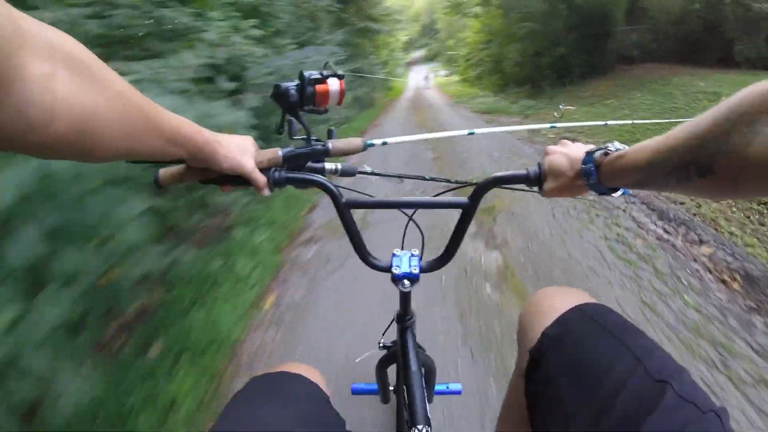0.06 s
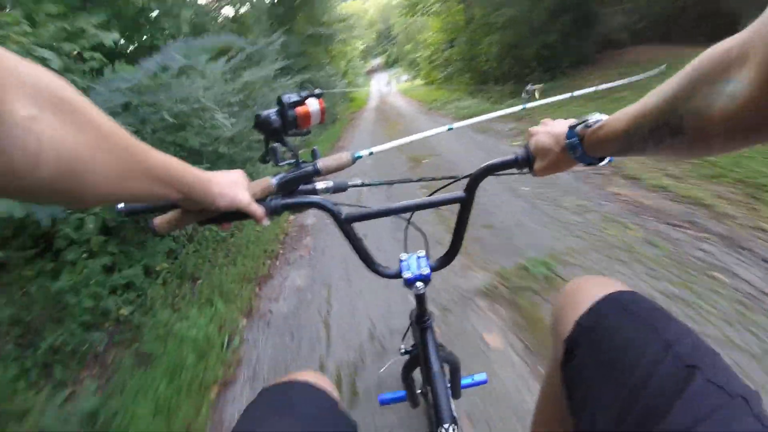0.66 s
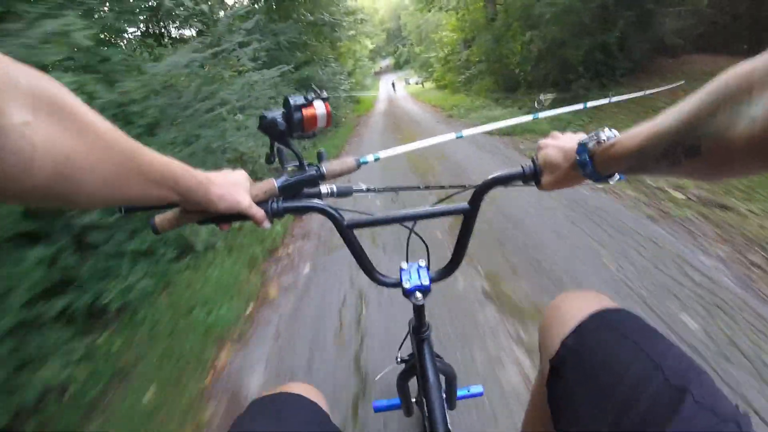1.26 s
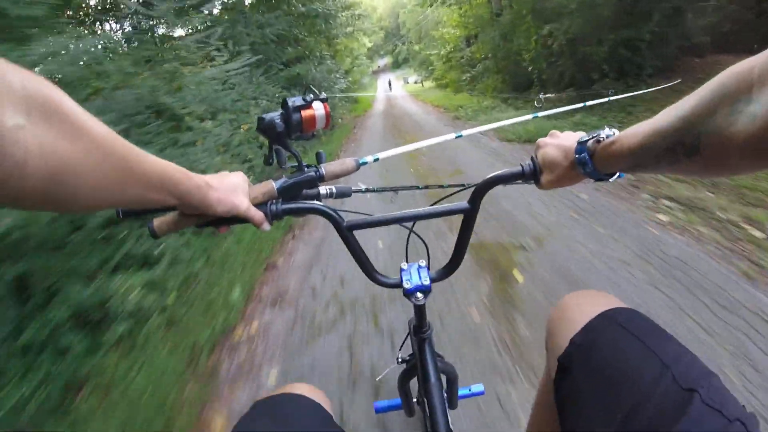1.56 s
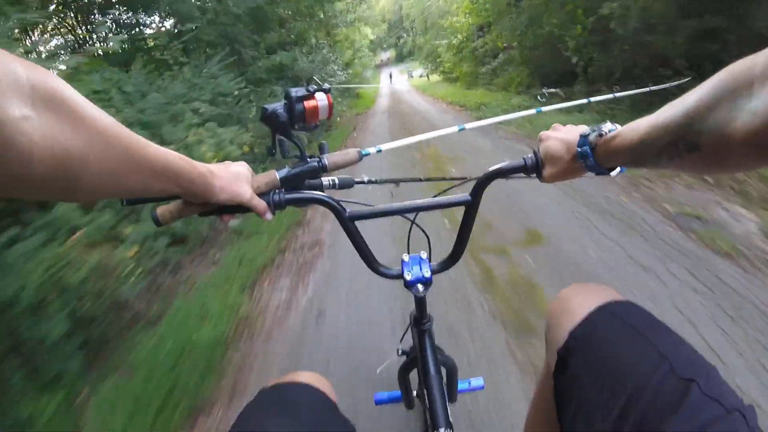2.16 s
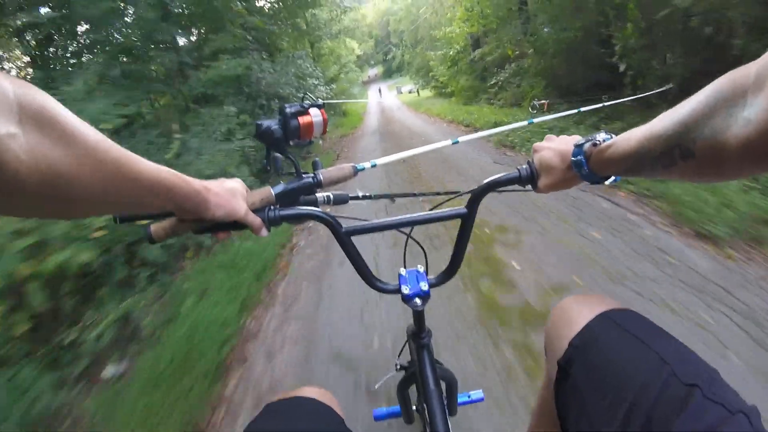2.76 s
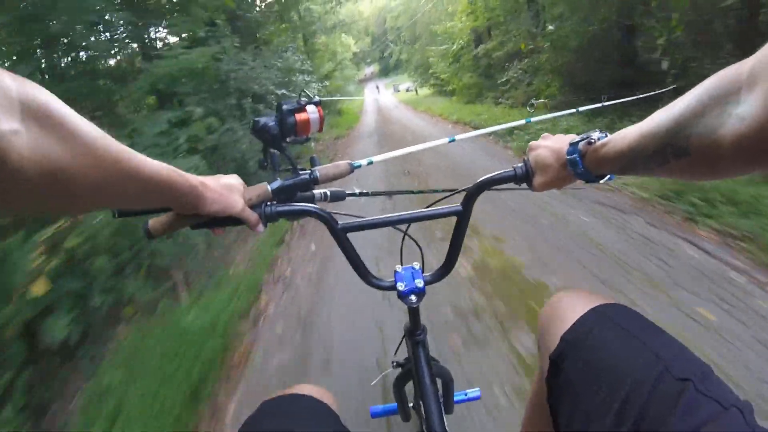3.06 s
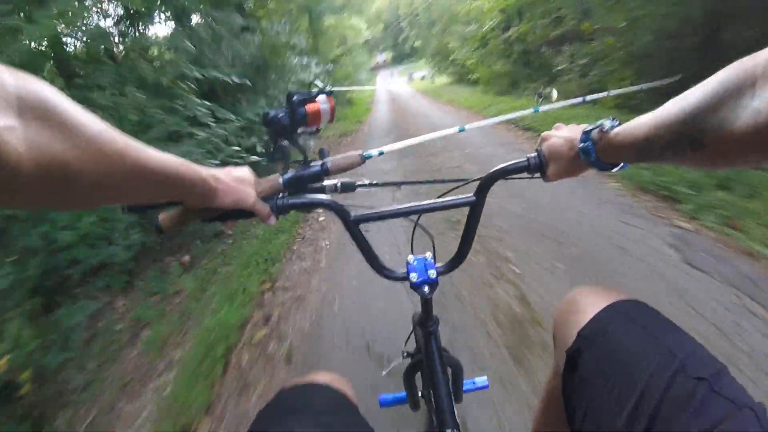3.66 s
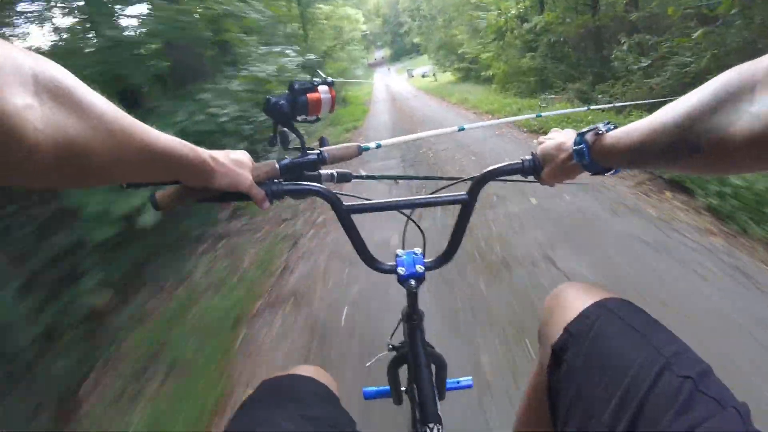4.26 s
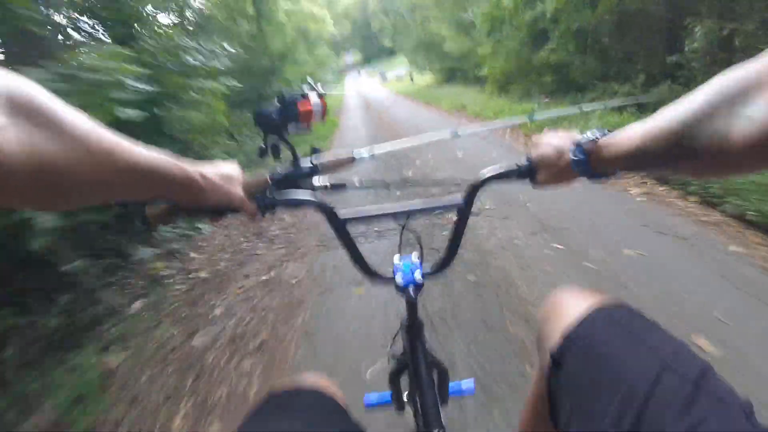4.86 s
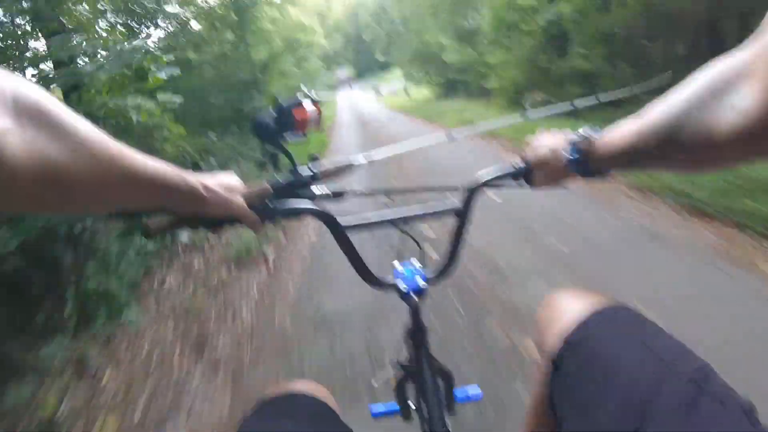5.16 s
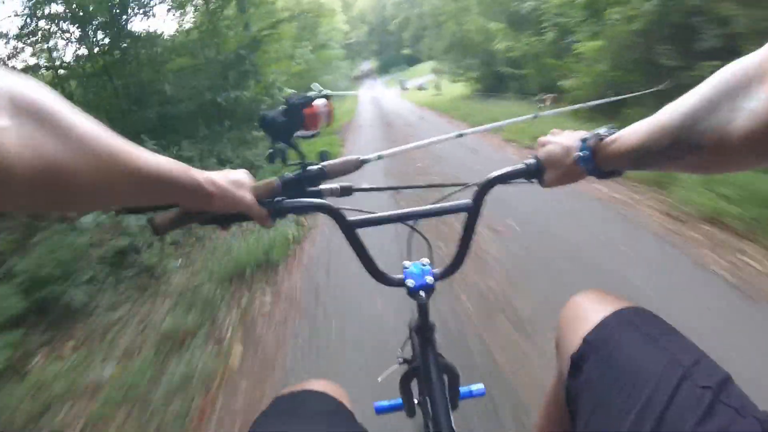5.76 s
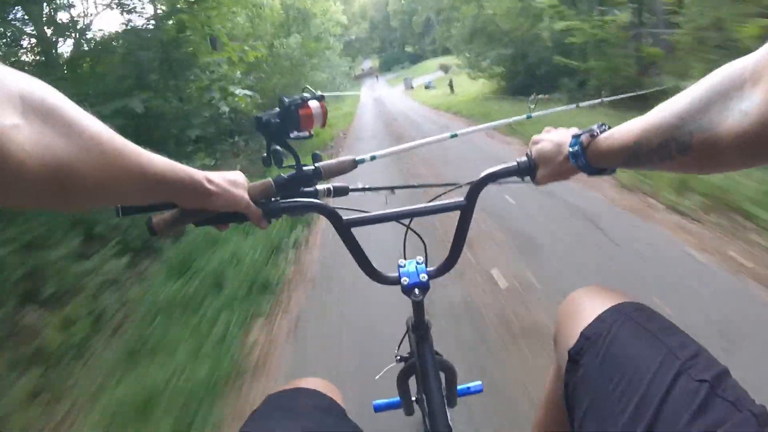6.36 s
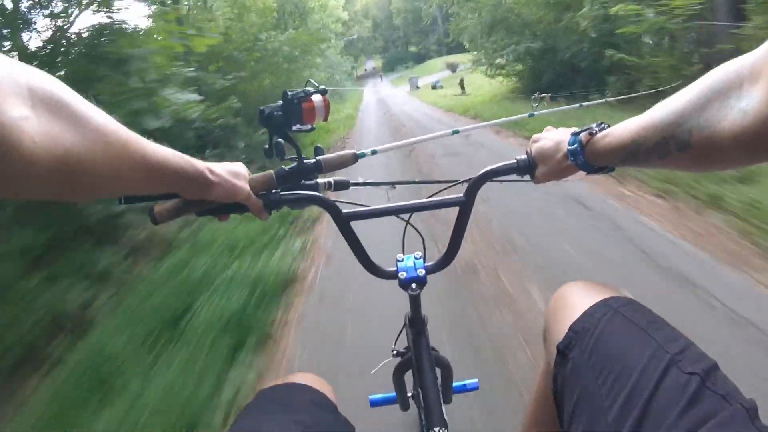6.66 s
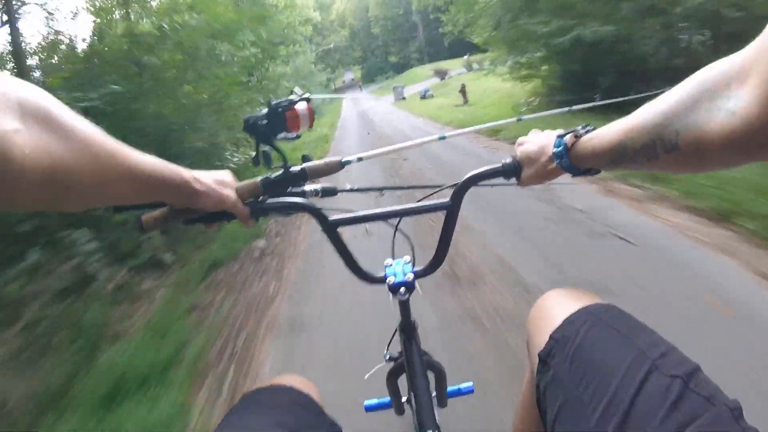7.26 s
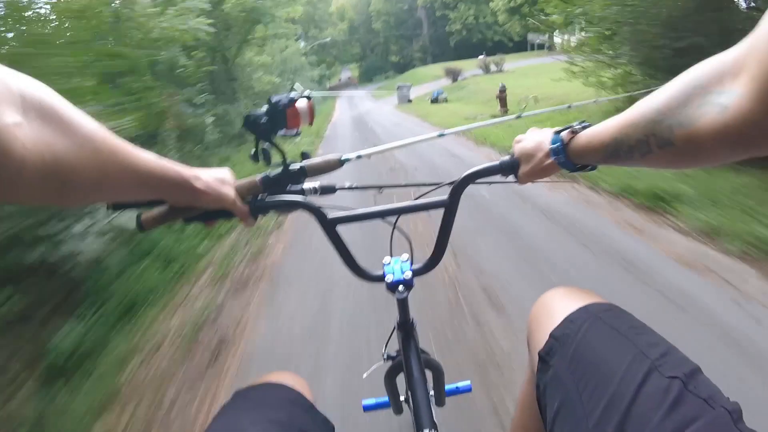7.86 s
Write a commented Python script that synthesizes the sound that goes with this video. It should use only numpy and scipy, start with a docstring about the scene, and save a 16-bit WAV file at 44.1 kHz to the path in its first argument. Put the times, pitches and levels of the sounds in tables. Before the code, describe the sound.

A bicycle coasts downhill with a ticking freewheel, tyre rumble, light knocks and wind buffeting the microphone, growing louder with speed.

```python
"""Bicycle coasting downhill

A bicycle gathers speed on a paved lane, heard from the rider's chest. Wind buffets the microphone,
the tyres rumble and flick grit, the freewheel pawl ticks ever faster and the bearings start to sing.
A fishing rod knocks on the handlebar over rough ground, where bumps jolt the microphone."""
import sys
import numpy as np
from scipy.fft import rfft, irfft, next_fast_len
from scipy.io import wavfile
from scipy.ndimage import map_coordinates

SR = 44100
rng = np.random.default_rng(int(sys.argv[2]) if len(sys.argv) > 2 else 0)


def digitize_waveform(pressure):
    """Quantize a signal to 16-bit integers and store it at the path in sys.argv[1].

    Rows of a 2-D input are taken as channels; values are limited to [-1, 1].
    """
    field = np.atleast_2d(pressure).T
    bounded = np.clip(field, -1, 1)
    quanta = np.round(bounded * 32767).astype(np.int16)
    wavfile.write(sys.argv[1], SR, quanta)


N = 352800
TIME = np.arange(N) / SR
CRUISE_TICK_HZ = 42

# Speed as freewheel tick rate: time_s, tick_hz
SPEED_CURVE = [(0.0, 35.27), (1.0, 41.03), (2.1, 41.34), (3.4, 44.39), (4.7, 53.1), (5.3, 58.74),
               (6.0, 62.27), (7.6, 80.15), (8.0, 79.71)]
# Pavement stretches, -1 smooth to 1 rough: centre_s, half_width_s, roughness
PAVEMENT = [(.4, 0.41, -0.21), (1.35, 0.3, 0.26), (4.1, 0.25, -0.44), (5.0, 0.23, 0.73), (5.6, 0.37, 0.9),
            (6.5, .2, .15), (7.65, 0.44, 0.47)]
# Headwind gusts and lulls: centre_s, half_width_s, gain_db
WIND_GUSTS = [(.58, 0.29, -3), (.94, 0.27, 0.5), (1.81, 0.06, 0.5), (2.4, 0.085, 0), (2.85, .2, 0),
              (4.3, 0.16, -5), (5.22, 0.093, 1), (5.69, 0.062, 3), (6.15, 0.3, -1.5), (6.98, 0.064, 0),
              (7.36, 0.091, -7), (7.53, .05, 3), (7.8, 0.25, 3.5)]
# Slow buffeting: freq_hz, density_db
BUFFET_SPECTRUM = [(5, -17), (13, 5.5), (24, -5), (39, 0.5), (50, -4), (64, -10.5), (85, -12), (105, -19),
                   (160, -23), (300, -43.5), (800, -42.5), (4000, -120)]
# Small eddies: freq_hz, density_db
EDDY_SPECTRUM = [(30, -42), (62, 10.5), (110, 7), (230, -25), (420, -4), (650, -17), (2000, -25),
                 (9000, -102)]
# Shed vortices: centre_s, half_width_s, peak_db, rate_hz
VORTEX_TRAINS = [(0.093, 0.14, -34, 38), (0.95, 0.091, -28.5, 37), (1.255, 0.084, -31, 42.4),
                 (1.685, 0.03, -30, 39.5), (2.04, 0.1, -28, 14), (2.21, 0.056, -31.5, 34),
                 (2.58, 0.098, -30, 25), (3.664, 0.032, -35, 46), (3.94, 0.025, -31, 39),
                 (5.28, 0.18, -28.5, 21.7), (5.743, 0.15, -25.5, 11.5), (6.99, 0.062, -28, 59),
                 (7.728, 0.067, -27.5, 52), (7.88, .05, -29, 40)]
# Tyre casing rumble: freq_hz, density_db
CASING_SPECTRUM = [(80, -10.5), (140, -11.5), (205, -12.5), (235, -8), (258, -2.5), (285, -4), (318, 2),
                   (350, -9.5), (400, -14.5), (480, -10), (560, -14), (660, -13), (800, -23.5),
                   (6000, -59.5)]
# Tread hiss: freq_hz, density_db
TREAD_SPECTRUM = [(150, -29), (850, 1.5), (1200, -4), (1450, 2), (1680, -2), (1850, 3), (2020, -1),
                  (2250, 0.5), (2550, -6.5), (2870, -6), (3200, -6.5), (4200, -13), (8000, -7.5),
                  (14000, -47)]
# Harder pawl bites: centre_s, half_width_s, gain_db
PAWL_BITES = [(.632, .028, 4), (3.05, .03, 0)]
# Hub shell resonances: freq_hz, width_hz, gain_db
SHELL_MODES = [(1850, 60, -6), (3030, 170, -13.5), (4920, 60, -9.5), (5405, 90, -5.5), (5750, 50, -3.5),
               (6190, 30, 1), (6444, 14, 8), (6950, 43, -14)]
# Pawls sliding between teeth: freq_hz, density_db
WHIRR_SPECTRUM = [(1500, -55), (4200, -19.5), (4900, -5.5), (5400, 1.5), (6300, 1), (6900, 0.5), (7400, -4),
                  (7850, -5), (8300, -7.5), (9000, -8.5), (10300, -16.5), (10700, -16), (12600, -16.5),
                  (14000, -39)]
# Rod on handlebar: start_s, level_db, tilt_db_per_octave
ROD_KNOCKS = [(0.094, -46, -2), (0.5407, -39.5, -3), (0.9183, -38, 1), (1.0094, -25.5, 1), (1.254, -36, 0),
              (2.0205, -36, 0), (2.4882, -35, 0), (2.578, -30.5, -2), (2.7005, -43, -2), (2.952, -46.5, 1),
              (3.057, -46, -5), (4.459, -49, -6), (4.737, -33.5, 1), (4.7855, -35, 1), (4.8823, -36, -8),
              (4.9919, -26.5, 0), (5.0903, -32, -6), (5.1716, -28.5, 7), (5.253, -32.5, 0),
              (5.4017, -27, -4), (5.4864, -37, 1), (5.5263, -34, 6), (5.5832, -34, -3), (5.6548, -31, 0),
              (5.7486, -30.5, 0), (5.8277, -37.5, -5)]
# Rod and reel modes: freq_hz, level_db, t60_s
ROD_MODES = [(1693, -16, 0.072), (2054, -4, 0.034), (2205, -2.5, 0.031), (2860, 0, 0.03), (3105, -18, 0.05),
             (3400, -27, 0.035), (4750, -14.5, 0.025), (5200, -19, 0.02), (5900, -7.5, 0.021),
             (6690, -16, 0.018)]
# Tyre scuff: freq_hz, density_db
SCUFF_SPECTRUM = [(1500, -29), (2100, 9), (3000, -5), (4200, -8), (6000, 5), (8000, -13), (11000, -17),
                  (14000, -33)]
# Grit under the tyres: start_s, peak_db, snap_hz, t60_s, ping_hz, ping_over_snap_db
GRIT_SNAPS = [(.2464, -37.5, 3640, .012, 5750, -2), (.2774, -36, 2900, .014, 5750, -9),
              (0.2833, -30, 3600, 0.033, 5750, 9), (.3364, -32.5, 4200, 0.0082, 5750, 2),
              (0.387, -32.5, 2800, 0.011, 5750, 4), (1.455, -33.5, 1180, 0.018, 5550, -2.5),
              (2.8345, -32, 4300, 0.072, 5750, 7), (3.204, -34.5, 3400, 0.012, 5000, 0),
              (3.3848, -29, 2220, 0.0045, 3180, -7), (3.8930, -28.5, 1890, 0.006, 3240, -3),
              (4.491, -37.5, 2200, 0.03, 3600, -8), (4.6097, -27.5, 2300, 0.016, 2400, -9),
              (4.694, -36.5, 3000, 0.012, 5130, 12), (4.948, -30.5, 5000, 0.036, 5750, 18),
              (4.9868, -28.5, 3000, .0097, 5750, 11), (5.3785, -29.5, 4500, .009, 6250, 8),
              (6.141, -34, 2200, 0.018, 5750, -3), (6.472, -37, 2330, 0.02, 5750, -3),
              (6.489, -33, 2600, .018, 5530, -1), (7.5267, -33, 4500, .045, 5900, 7),
              (7.541, -25.5, 1990, 0.01, 5200, -2), (7.567, -36, 2900, 0.029, 5750, -1),
              (7.6842, -30, 2500, 0.037, 5750, 0), (7.689, -29, 1190, 0.06, 5400, -3)]
# Microphone jolts: start_s, push_db, push_rise_s, knock_db, knock_hz
JOLTS = [(0.392, -27.5, 0.0012, -34, 193), (4.957, -25, 0.0021, -23, 140),
         (5.1228, -15.5, 0.0042, -16, 440), (5.126, -21, 0.0036, -14.5, 195),
         (5.6208, -9, 0.0024, -25.5, 816), (5.624, -24, .004, -20, 260)]
# Bearing race resonances: freq_hz, width_hz, gain_db
RACE_MODES = [(5400, 130, 3.5), (5770, 140, 3), (7790, 690, 1.5)]


def amp(db):
    """Decibels to gain."""
    return 10 ** (np.asarray(db) / 20)


def unit(x):
    """Scale to rms 1."""
    return x / np.sqrt(np.mean(x ** 2) + 1e-20)


def tick_rate_hz():
    """Freewheel tick rate at each sample."""
    return np.interp(TIME, *np.transpose(SPEED_CURVE))


def doublings():
    """Speed doublings above cruise."""
    return np.log2(tick_rate_hz() / CRUISE_TICK_HZ)


def swells(rows):
    """Sum of bell curves: centre_s, half_width_s, height."""
    return sum(height * np.exp(-((TIME - centre_s) / half_s) ** 2) for centre_s, half_s, height in rows)


def wobble(knot_hz):
    """Smooth random curve."""
    return map_coordinates(rng.standard_normal(int(N * knot_hz / SR) + 4), [TIME * knot_hz])


def filtered(x, response):
    """Apply a frequency response."""
    size = next_fast_len(len(x) + SR // 4)
    return irfft(rfft(x, size) * response(np.fft.rfftfreq(size, 1 / SR)), size)[:len(x)]


def resonance(f, hz, width_hz):
    """Response of one damped resonance."""
    return 1j * f * width_hz / (hz * hz - f * f + 1j * f * width_hz)


def band(x, hz, width_hz, stages=2):
    """Cascaded resonances, rms 1."""
    return unit(filtered(x, lambda f: resonance(f, hz, width_hz) ** stages))


def coloured(x, spectrum):
    """Shape by a spectrum, rms 1."""
    hz, db = np.transpose(spectrum)
    return unit(filtered(x, lambda f: amp(np.interp(np.log(f + 1), np.log(hz), db))))


def noise(spectrum):
    """Coloured noise, rms 1."""
    return coloured(rng.standard_normal(N), spectrum)


def add(track, start_s, sound):
    """Mix a sound into the track."""
    part = track[max(0, round(start_s * SR)):][:len(sound)]
    part += sound[:len(part)]


def wind(cruise_db=-38, db_per_doubling=7, buffet_swing_db=1, eddy_swing_db=3, eddy_db=-7):
    """Air buffets the microphone; fluttering eddies take a larger share with speed."""
    level_db = cruise_db + db_per_doubling * doublings() + swells(WIND_GUSTS)
    tick_hz = tick_rate_hz()
    buffet = unit(noise(BUFFET_SPECTRUM) * amp(buffet_swing_db * wobble(7)))
    eddies = unit(noise(EDDY_SPECTRUM) * amp(eddy_swing_db * wobble(25)))
    share = amp(eddy_db) * (tick_hz / tick_hz.max()) ** 3.7
    return amp(level_db) * (buffet + share * eddies) / np.hypot(1, share)


def vortices(waver=0.13, waver_hz=18):
    """Short vortex trains beat on the microphone at an unsteady rate."""
    out = np.zeros(N)
    for centre_s, half_s, peak_db, rate_hz in VORTEX_TRAINS:
        cycles = np.cumsum(rate_hz * (1 + waver * wobble(waver_hz))) / SR + rng.random()
        out += swells([(centre_s, half_s, amp(peak_db))]) * np.sin(2 * np.pi * cycles)
    return out


def tyres(casing_db=-46.5, tread_db=-56, rough_db=2.5, texture_swing_db=1.03, grain_swing_db=2):
    """Road texture drums the casings, tread hisses on stones; both grow with speed and roughness."""
    faster = doublings()
    pavement_db = rough_db * swells(PAVEMENT)
    texture_db = texture_swing_db * wobble(22)
    rumble_db = casing_db + 9.5 * faster - 3.5 * faster ** 2 + pavement_db + texture_db
    hiss_db = tread_db + 4.5 * faster + pavement_db + texture_db / 2
    rumble = noise(CASING_SPECTRUM) * amp(rumble_db)
    hiss = noise(TREAD_SPECTRUM) * amp(hiss_db + grain_swing_db * wobble(250))
    return rumble + hiss


def freewheel(base_db=-52.5, rough_db=2.5, teeth_per_turn=10, swing_db=2.5, scatter_db=1.35,
              base_hz=6260, reversal_tick_hz=60):
    """The pawl scrapes each tooth, chirps and rings the hub shell; it whirrs between teeth."""
    tick_hz, faster = tick_rate_hz(), doublings()
    teeth = np.cumsum(tick_hz) / SR
    tooth = np.round(teeth).astype(int)
    turn = np.cos(2 * np.pi * (tooth - 3.2) / teeth_per_turn)  # harder on one side of each turn
    force = amp(swells(PAWL_BITES) + swing_db * turn + scatter_db * rng.standard_normal(SR)[tooth])
    # Time from the nearest tooth tip, scaled so scrapes shorten with speed.
    from_tip = (teeth - tooth) / tick_hz * (tick_hz / tick_hz.mean()) ** 0.31
    rise, fall = from_tip / 0.0014, from_tip / 0.0025
    scrape = force * np.exp(np.where(from_tip < 0, -rise ** 2, -fall))

    # Chirps glide up when slow, down when fast.
    glide = 0.0515 * (reversal_tick_hz - tick_hz) / (reversal_tick_hz - CRUISE_TICK_HZ)
    pitch_hz = base_hz * (1 + glide * np.tanh(fall)) * (tick_hz.mean() / tick_hz) ** 0.06
    jitter_rad = 0.66 * np.pi * wobble(600)
    tone = unit(np.sin(2 * np.pi * np.cumsum(pitch_hz) / SR + jitter_rad))
    chirp = amp(6 - 0.5 * faster) * scrape * tone

    shell = lambda f: sum(amp(db) * resonance(f, hz, width_hz) for hz, width_hz, db in SHELL_MODES)
    scrape_rms = np.sqrt(np.mean(scrape ** 2))
    ring = amp(3) * scrape_rms * unit(filtered(scrape * rng.standard_normal(N), shell))
    whirr = noise(WHIRR_SPECTRUM) * amp(-4.5 - 0.5 * faster + 1.2 * wobble(60))
    level_db = base_db + 0.2 * faster + rough_db * swells(PAVEMENT)
    return amp(level_db) * (chirp + ring + whirr)


def rod_jiggles(rate_hz=1, level_db=-45, spread_db=2):
    """Faint random knocks, columns as in ROD_KNOCKS."""
    gap_draws, level_draws = rng.random((64, 2)).T
    starts_s = np.cumsum(0.5 + gap_draws) / rate_hz
    levels_db = level_db + spread_db * (2 * level_draws - 1)
    return [(start_s, db, 0) for start_s, db in zip(starts_s, levels_db) if start_s < N / SR]


def rod(gain_db=1, scatter_db=3, detune=0.0058, pivot_hz=2500, buzz_hz=700,
        crack_db=-14, crack_t60_s=0.04, attack_s=0.00079):
    """Handlebar knocks ring rod and reel; tuning, damping and buzz vary as the rod shifts in the grip."""
    out, t = np.zeros(N), TIME[:SR // 8]
    for start_s, level_db, tilt_db_per_octave in list(ROD_KNOCKS) + rod_jiggles():
        damping = np.exp(0.14 * rng.standard_normal())
        ring = np.zeros(len(t))
        for hz, mode_db, t60_s in ROD_MODES:
            tilt_db = tilt_db_per_octave * np.log2(hz / pivot_hz)
            onset_db = mode_db + tilt_db + scatter_db * rng.standard_normal()
            pitch_hz = hz * (1 + detune * rng.standard_normal())
            ring += amp(onset_db - 60 * damping * t / t60_s) * np.sin(2 * np.pi * pitch_hz * t)
        burst = band(rng.standard_normal(len(t)), hz=2400, width_hz=3100)
        crack = amp(crack_db - 60 * t / crack_t60_s) * burst
        buzz = 1 + 0.23 * map_coordinates(rng.standard_normal(len(t)), [t * buzz_hz])
        knock = (ring * buzz + crack) * (1 - np.exp(-t / attack_s))
        add(out, start_s, amp(level_db + gain_db) * knock / np.abs(knock).max())
    return out


def scuff(start_s=0.24, length_s=0.12, level_db=-49.5, grains_per_s=1700):
    """A tyre scrapes through loose grit: dense tiny grains swell and fade."""
    grains = (rng.random(N) < grains_per_s / SR) * rng.standard_normal(N)
    progress = np.clip((TIME - start_s) / length_s, 0, 1)
    arch = 2 * np.sqrt(progress * (1 - progress))
    return amp(level_db) * arch * coloured(grains, SCUFF_SPECTRUM)


def grit(hollow_hz=4200, hollow_width_hz=1700, hollow_depth=0.79, rolloff_hz=7800):
    """Stones snap, coloured by their size and a hollow near 4.2 kHz, with softened treble; metal pings."""
    out, t = np.zeros(N), TIME[:SR // 12]
    hollow = lambda f: 1 - hollow_depth * resonance(f, hollow_hz, hollow_width_hz)
    colour = lambda f: hollow(f) / np.hypot(1, (f / rolloff_hz) ** 3)
    crack = 5 * (t == 0)
    for start_s, peak_db, snap_hz, t60_s, ping_hz, ping_over_snap_db in GRIT_SNAPS:
        crumble, metal = rng.standard_normal((2, len(t))) * amp(-60 * t / t60_s)
        stone = lambda f: resonance(f, snap_hz, 1.02 * snap_hz) ** 2
        snap = unit(filtered(crumble + crack, lambda f: stone(f) * colour(f)))
        ping = band(metal, ping_hz, width_hz=0.31 * ping_hz)
        hit = snap + amp(ping_over_snap_db) * ping
        add(out, start_s, amp(peak_db) * hit / np.abs(hit).max())
    return out


def bumps(knock_t60_s=0.016, attack_s=0.0025, sag_s=0.029, push_lag_s=0.011):
    """The microphone mount knocks, sagging in pitch; a push of air and its slow rebound follow."""
    out, t = np.zeros(N), TIME[:SR // 6]
    envelope = amp(-60 * t / knock_t60_s) * (1 - np.exp(-t / attack_s))
    for start_s, push_db, push_rise_s, knock_db, knock_hz in JOLTS:
        rattle = band(rng.standard_normal(len(t)), knock_hz, width_hz=knock_hz / 2, stages=3)
        thud = np.sin(2 * np.pi * knock_hz * sag_s * np.log1p(t / sag_s))
        add(out, start_s, 2 * amp(knock_db) * (thud + 0.4 * rattle) * envelope)
        from_peak = (TIME - start_s - push_lag_s) / push_rise_s
        push = np.exp(-np.where(from_peak < 0, from_peak, from_peak / 1.6) ** 2)
        rebound = 0.22 * np.exp(-(from_peak / 7 - 0.5) ** 2)
        out += amp(push_db) * (push - rebound)
    return out


def bearings(top_speed_db=-57, speed_exponent=5):
    """The races sing in a few bands, emerging as the wheels spin up."""
    tick_hz = tick_rate_hz()
    races = lambda f: sum(amp(db) * resonance(f, hz, width_hz) ** 2 for hz, width_hz, db in RACE_MODES)
    gain = amp(top_speed_db) * (tick_hz / tick_hz.max()) ** speed_exponent
    return gain * unit(filtered(rng.standard_normal(N), races))


def scene():
    """Close sources in open air, mono."""
    rolling = wind() + vortices() + tyres() + freewheel() + bearings()
    return (rolling + rod() + grit() + scuff() + bumps())[None]


def record(dry, rolloff_hz=12700, limit_hz=13900):
    """Microphone treble roll-off and recorder band limit."""
    response = lambda f: (f < limit_hz) / np.hypot(1, (f / rolloff_hz) ** 10)
    return np.array([filtered(channel, response) for channel in dry])


dry = scene()
out = record(dry)
digitize_waveform(out)
```